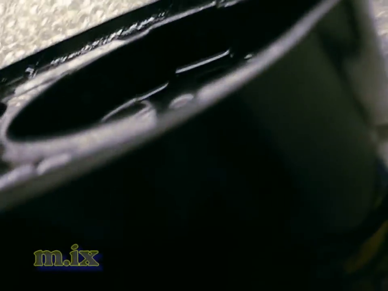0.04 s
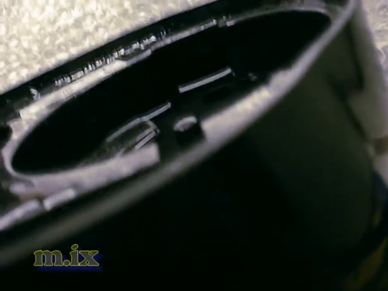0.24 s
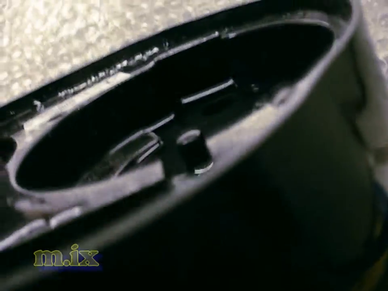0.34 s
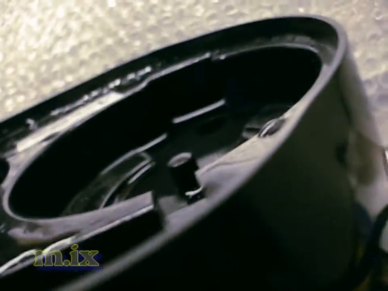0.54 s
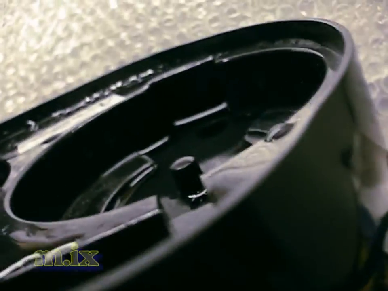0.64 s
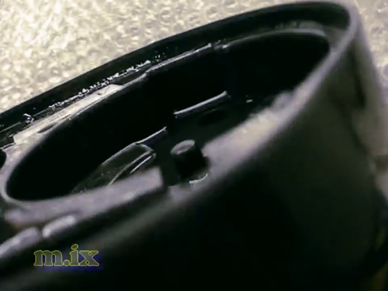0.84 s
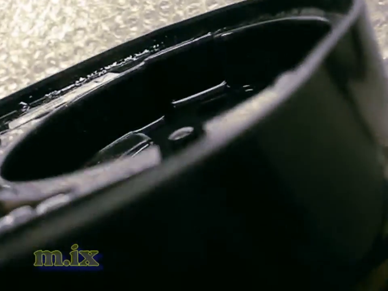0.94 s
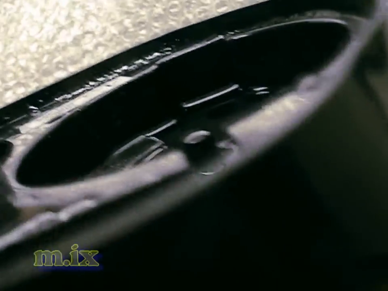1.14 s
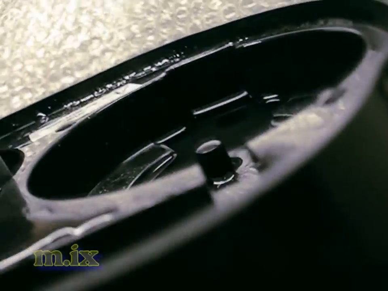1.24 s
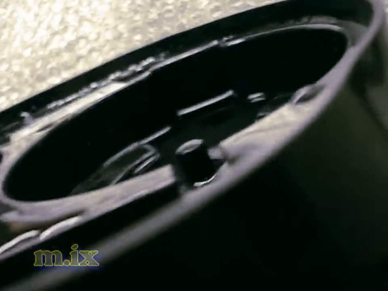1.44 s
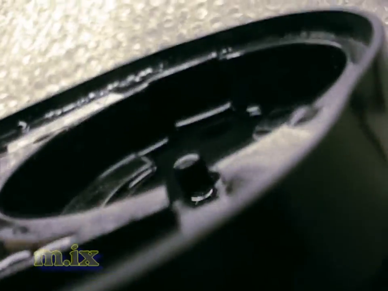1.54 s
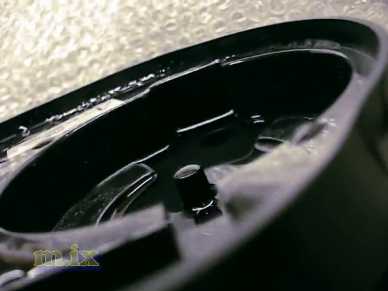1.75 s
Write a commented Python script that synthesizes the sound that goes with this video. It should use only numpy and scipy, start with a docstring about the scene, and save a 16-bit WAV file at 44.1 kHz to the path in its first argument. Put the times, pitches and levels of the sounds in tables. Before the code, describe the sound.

A hollow plastic appliance knocks dully and scrapes as it is shifted on a padded surface.

```python
"""A hollow plastic appliance is shifted on a padded surface, over the faint hiss and rumble of a
slightly live room. It slides a little, then knocks down twice, each time with two small bounces:
the housing rings and its loose parts clatter. It scrapes, creaks and settles with low bumps.
Then fingers tap and rub the shell, which ticks and, near the end, gives one short squeak."""
import sys
import numpy as np
from scipy import signal
from scipy.fft import rfft, irfft
from scipy.io import wavfile
from scipy.ndimage import uniform_filter1d, minimum_filter1d

SR = 44100
rng = np.random.default_rng(int(sys.argv[2]) if len(sys.argv) > 2 else 0)


def unload_audio(sound):
    """Save the sound as a 16-bit wav file, at the path given as the first command line argument."""
    columns = np.transpose(np.atleast_2d(sound))
    # keep every value between -1 and 1, then stretch to whole-number steps
    steps = np.round(np.clip(columns, -1, 1) * 32767)
    wavfile.write(sys.argv[1], SR, steps.astype(np.int16))


N = 79380
TIME = np.arange(N) / SR
FREQS = np.maximum(np.fft.rfftfreq(N, 1 / SR), 1)
TILT_PIVOT_HZ = 348   # just above the housing's main ring


def from_db(db):
    """Decibels to gain."""
    return 10 ** (np.asarray(db) / 20)


def unit_rms(x):
    """Scale to rms 1."""
    return x / np.sqrt(np.mean(x ** 2) + 1e-20)


def at_hz(points, hz):
    """Read a curve on a log-frequency axis."""
    freqs, values = np.transpose(points)
    return np.interp(np.log(hz), np.log(freqs), values)


def colour(points, treble_db=0):
    """An EQ curve at unit power, then tilted by treble_db per octave above the pivot."""
    gain = unit_rms(from_db(at_hz(points, FREQS)))
    return gain * from_db(treble_db * np.maximum(np.log2(FREQS / TILT_PIVOT_HZ), 0))


def noise_bands(spectrum=1):
    """Coloured noise in half-octave bands, as (centre_hz, noise) pairs."""
    noise = irfft(rfft(rng.standard_normal((2, N))) * spectrum, N)
    edges_hz = np.geomspace(28, 14000, 19)
    bands = []
    for k, (low, high) in enumerate(zip(edges_hz, edges_hz[1:])):
        bandpass = signal.butter(2, [low, high], "band", fs=SR, output="sos")
        bands.append((np.sqrt(low * high), signal.sosfilt(bandpass, noise[k % 2])))
    return bands


def strike(start_s, modes, rise_s, hold_s=0.027, treble_db=0, pitch_ratio=1):
    """Struck modes swell, hold and die away; a softer contact tilts the upper ones down."""
    age = np.maximum(TIME - start_s, 0)
    dying = np.maximum(age - hold_s, 0)
    ring = 0
    for hz, db, t60 in modes:
        tilt_db = treble_db * max(np.log2(hz / TILT_PIVOT_HZ), 0)
        ring += from_db(db + tilt_db - 60 * dying / t60) * np.sin(2 * np.pi * hz * pitch_ratio * age)
    return (1 - np.exp(-(age / rise_s) ** 2)) * ring


# Tone of the noise bed: freq_hz, level_db
ROOM_TONE_EQ = [(25, -8.5), (60, -3), (130, -6.5), (290, 1), (600, -9.5), (1200, -10), (2500, -16),
                (4500, -19), (8000, -19.5), (10000, -22.5)]

def room_tone(level_db=-65):
    """A steady bed of rumble and hiss."""
    return from_db(level_db) * irfft(rfft(rng.standard_normal(N)) * colour(ROOM_TONE_EQ), N)


# Length of the room's tail: freq_hz, t60_s
REVERB_DECAY = [(100, 1), (300, 1), (800, .6), (2000, 0.4), (8000, 0.42)]

def reverb(send, predelay_s=0.0091):
    """The room answers with a diffuse tail that hangs longest in the bass."""
    age, tail = np.maximum(TIME - predelay_s, 0), 0
    for hz, noise in noise_bands():
        envelope = (age > 0) * from_db(-60 * age / at_hz(REVERB_DECAY, hz))
        tail += noise * envelope / np.sqrt(np.sum(envelope ** 2))
    return signal.fftconvolve(send, tail)[:N]


# Resonances that sing in the squeak: pitch_hz, level_db
SQUEAK_TONES = [(1007, -45.5), (1497, -51), (2062, -54), (2640, -58), (3450, -62)]

def squeak(peak_s=1.745, rise_s=0.007, fall_s=0.016, jitter=0.0299, roughness=0.42):
    """A finger catches on the plastic: each resonance wavers in pitch and strength."""
    def waver():
        return unit_rms(uniform_filter1d(rng.standard_normal(N), size=70))
    age, tone = TIME - peak_s, 0
    envelope = np.exp(-.5 * (np.minimum(age, 0) / rise_s) ** 2 - np.maximum(age, 0) / fall_s)
    for hz, db in SQUEAK_TONES:
        strength = from_db(db) * (1 + roughness * waver())
        pitch_hz = hz * (1 + jitter * waver())
        tone += strength * np.sin(2 * np.pi * np.cumsum(pitch_hz) / SR)
    return envelope * tone


# Small pitched creaks of the shell: start_s, level_db, pitch_hz
SHELL_TICKS = [(0.204, -60, 3750), (0.212, -55.5, 2830), (0.375, -58.5, 1290), (0.405, -58, 1350),
               (0.438, -62.5, 2550), (0.639, -53, 1376), (0.64, -59.5, 3010), (0.705, -59.5, 2140),
               (0.778, -47, 2570), (0.805, -53.5, 3390), (0.841, -60, 2150), (0.864, -65, 2696),
               (1.062, -57.5, 1700), (1.118, -63, 2380), (1.357, -60, 1956), (1.396, -62, 1880),
               (1.642, -63, 1490), (1.673, -66, 3000)]

def ticks(width_hz=330, rise_s=0.0058):
    """Each tick is a short burst of friction into one narrow resonance of the shell."""
    out, radius = 0, np.exp(-np.pi * width_hz / SR)
    for start_s, db, hz in SHELL_TICKS:
        progress = np.maximum(TIME - start_s, 0) / rise_s
        resonance = [1, 0, -1, 1, -2 * radius * np.cos(2 * np.pi * hz / SR), radius * radius]
        creak = unit_rms(signal.sosfilt([resonance, resonance], rng.standard_normal(N)))
        out += from_db(db) * progress * np.exp(1 - progress) * creak
    return out


# Scrapes and rubs, each a bell-shaped swell: peak_s, sigma_s, level_db, treble_db_per_octave
SLIDE_STROKES = [(0.0, 0.11, -66, 1), (0.244, 0.013, -56.5, 3), (0.412, .04, -65, 2),
                 (0.483, 0.0029, -49, 4.5), (0.718, 0.032, -56, .5), (0.771, 0.0037, -48, -1),
                 (0.784, 0.0076, -44, -.3), (0.807, .013, -41.5, 1), (0.838, 0.011, -48.5, 0.5),
                 (0.961, 0.018, -50, -6.5), (1.02, 0.031, -56.5, -6), (1.352, 0.046, -61.5, -.5),
                 (1.567, 0.023, -57, 0), (1.742, 0.013, -53, 0.1), (1.79, 0.016, -59, 1.5)]
# Tone of the rubbed shell: freq_hz, level_db
SLIDE_EQ = [(50, -13.5), (130, -4.5), (270, 2.5), (430, 0.5), (600, -8), (1000, -5.5), (1400, -11.5),
            (2200, -13.5), (2670, -12.5), (2980, -20.5), (3400, -17.5), (4400, -26), (5600, -26),
            (6500, -34), (10000, -48)]

def slides(slips_per_s=3500, spread_db=1.5):
    """Sliding plastic sticks and slips in dense, uneven grains, coloured by the shell."""
    sizes = from_db(spread_db * np.minimum(rng.exponential(1, N), 3)) * rng.choice([-1, 1], N)
    slips = sizes * (rng.random(N) < slips_per_s / SR)
    spectrum, out = rfft(unit_rms(slips)), 0
    for peak_s, sigma_s, db, treble_db in SLIDE_STROKES:
        swell = np.exp(-.5 * ((TIME - peak_s) / sigma_s) ** 2)
        out += from_db(db) * swell * irfft(spectrum * colour(SLIDE_EQ, treble_db), N)
    return out


# The base settling: start_s, level_db
SETTLING_BUMPS = [(0.597, -54), (0.745, -56.5), (0.785, -54), (0.850, -48), (0.940, -60), (1.060, -65)]
# Low boom of the base on its support: pitch_hz, level_db, t60_s
SUPPORT_MODES = [(74.3, -4.5, 0.32), (141.3, 2, 0.37), (172.7, -4, 0.95), (223, -5.5, 0.9)]

def bumps():
    """The weight drops softly onto the support and sets its low modes ringing."""
    return sum(from_db(db) * strike(start_s, SUPPORT_MODES, rise_s=0.0087)
               for start_s, db in SETTLING_BUMPS)


def thud(centre_s=0.501, sigma_s=0.0051, level_db=-39.5, pitch_hz=63):
    """One short, deep puff of low sound, just after the second knock."""
    age = TIME - centre_s
    return from_db(level_db) * np.exp(-.5 * (age / sigma_s) ** 2) * np.sin(2 * np.pi * pitch_hz * age)


# Tone of the dense upper modes and loose parts: freq_hz, level_db
CLATTER_EQ = [(40, -39.5), (85, -29.5), (130, -10), (280, -1), (480, -8), (710, -4.5), (800, -8),
              (1000, -10), (1320, -10.5), (1700, -17.5), (2600, -19.5), (3200, -23), (3950, -20),
              (4500, -34), (10000, -45.5)]
# Their decay, quickest at the top: freq_hz, t60_s
CLATTER_DECAY = [(100, 0.39), (400, 0.29), (1500, 0.13), (8000, 0.061)]

def clatter(hits, attack_s=0.0039, hold_s=0.016):
    """Each hit shakes crowded modes and loose parts: noise that dies band by band."""
    bands, out = noise_bands(colour(CLATTER_EQ)), 0
    for start_s, db, treble_db, bass_db in hits:
        age = np.maximum(TIME - start_s, 0)
        attack = np.minimum(age / attack_s, 1)
        dying = np.maximum(age - hold_s, 0)
        for hz, noise in bands:
            octaves = np.log2(hz / TILT_PIVOT_HZ)
            tilt_db = treble_db * octaves if octaves > 0 else -bass_db * octaves
            out += attack * noise * from_db(db + tilt_db - 60 * dying / at_hz(CLATTER_DECAY, hz))
    return out


# Taps at different spots on the wall: start_s, level_db, pitch_ratio
FINGER_TAPS = [(0.1700, -46, 1.24), (1.301, -50, 0.99), (1.447, -62.5, 1.06), (1.526, -56, 1.3),
               (1.6840, -42.5, 1.014)]
# Hollow note of the wall: pitch_hz, level_db, t60_s
WALL_MODES = [(257.3, -0.5, 0.34), (342.6, -0.5, 0.27), (422.5, -5.5, 0.19), (649, -21, 0.072)]

def taps(clatter_db=-8, treble_db=-1, bass_db=-6.5):
    """Fingertips meet the wall: a short ring and a little thin clatter."""
    ring = sum(from_db(db) * strike(start_s, WALL_MODES, rise_s=0.0012, hold_s=0.0066, pitch_ratio=ratio)
               for start_s, db, ratio in FINGER_TAPS)
    hits = [(start_s, db + clatter_db, treble_db, bass_db) for start_s, db, _ in FINGER_TAPS]
    return ring, clatter(hits)


# Two landings and their bounces:
# start_s, ring_db, clatter_db, treble_db_per_octave, bass_db_per_octave_down, pitch_ratio
HOUSING_KNOCKS = [(0.2014, -27.5, -31.5, -4, -4, 1.006), (0.246, -32.5, -37, -3, 5.5, 0.96),
                  (0.270, -37, -42.5, -5, 10.5, 0.97), (0.4830, -26, -33, 1, 1, .99),
                  (0.527, -39.5, -41.5, 0, 2, 1.0), (0.570, -36.5, -43, -15, 3.5, 1.05)]
# Boxy ring of the housing: pitch_hz, level_db, t60_s
HOUSING_MODES = [(133.8, -16.5, 0.83), (175.8, -18.5, 0.48), (233.5, -18, 0.76), (255.8, -7.5, 0.48),
                 (278, 1, .22), (314, -10.5, 0.62), (411, -15.5, 0.93), (561, -14, 0.3), (655, -11.5, 0.44),
                 (722.6, -17.5, 0.53), (904, -19, 0.35), (972, -18.5, 0.21), (1268, -16, 0.2),
                 (1297, -21.5, 0.23), (1370, -21, .25), (1995, -30.5, .25), (2694, -27, 0.046)]

def knocks(rise_s=0.0039):
    """The housing lands: its hollow body rings and its loose parts clatter."""
    ring, hits = 0, []
    for start_s, ring_db, clatter_db, treble_db, bass_db, ratio in HOUSING_KNOCKS:
        body = strike(start_s, HOUSING_MODES, rise_s, treble_db=treble_db, pitch_ratio=ratio)
        ring += from_db(ring_db) * body
        hits.append((start_s, clatter_db, treble_db, bass_db))
    return ring, clatter(hits)


def scene():
    """Ring, clatter and friction, each with its own reverb send, over the room tone in mono."""
    knock_ring, knock_rattle = knocks()
    tap_ring, tap_rattle = taps()
    ring = knock_ring + tap_ring + thud() + bumps()
    rattle = knock_rattle + tap_rattle
    friction = slides() + ticks() + squeak()
    send = from_db(-18.5) * ring + from_db(-6) * rattle + from_db(-9.5) * friction
    return (ring + rattle + friction + reverb(send) + room_tone())[None]


def limiter(x, ceiling_db=-19.5, release_db_per_s=154.5, lookahead_s=0.0011):
    """Peaks over the ceiling pull the gain down at once; it recovers at a steady rate."""
    over_db = np.maximum(20 * np.log10(np.abs(x) + 1e-9) - ceiling_db, 0)
    ramp_db = release_db_per_s * TIME
    gain_db = ramp_db - np.maximum.accumulate(over_db + ramp_db, axis=-1)
    window = int(2 * lookahead_s * SR) + 1
    return x * from_db(uniform_filter1d(minimum_filter1d(gain_db, window), window))


def record(dry, cutoff_hz=10050):
    """The loudest knocks are limited and the top end is cut steeply."""
    lowpass = signal.ellip(12, .2, 80, cutoff_hz, fs=SR, output="sos")
    return signal.sosfilt(lowpass, limiter(dry))


dry = scene()
out = record(dry)
unload_audio(out)
```